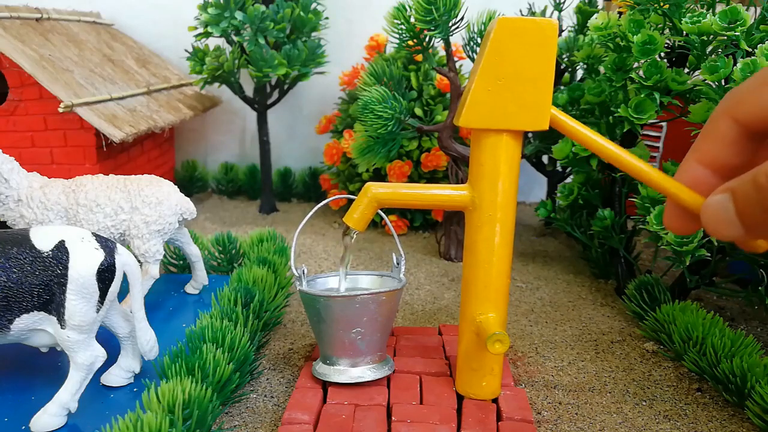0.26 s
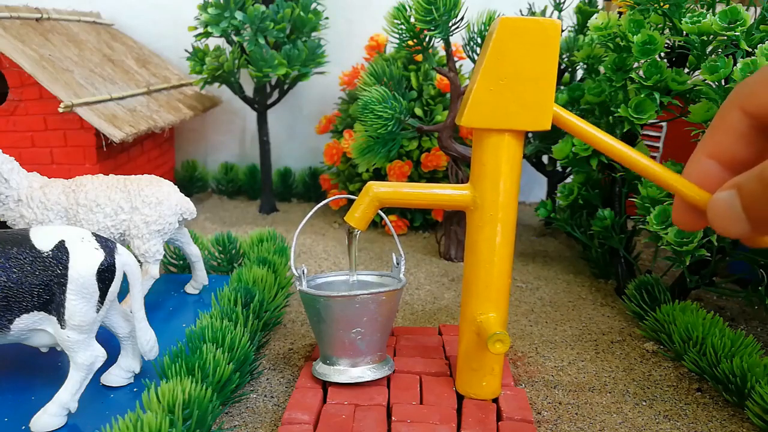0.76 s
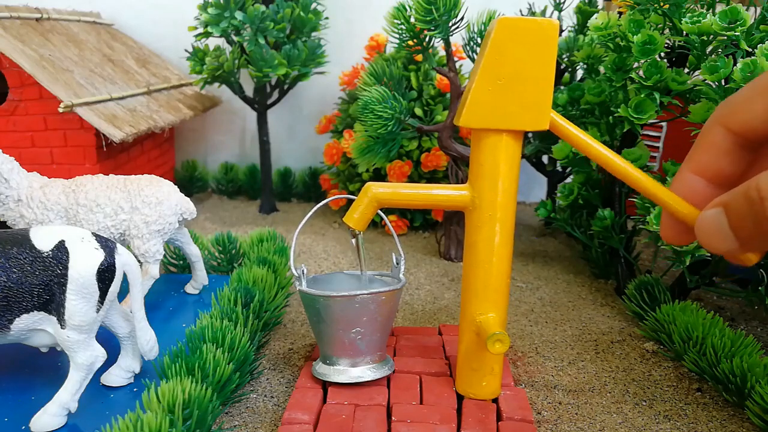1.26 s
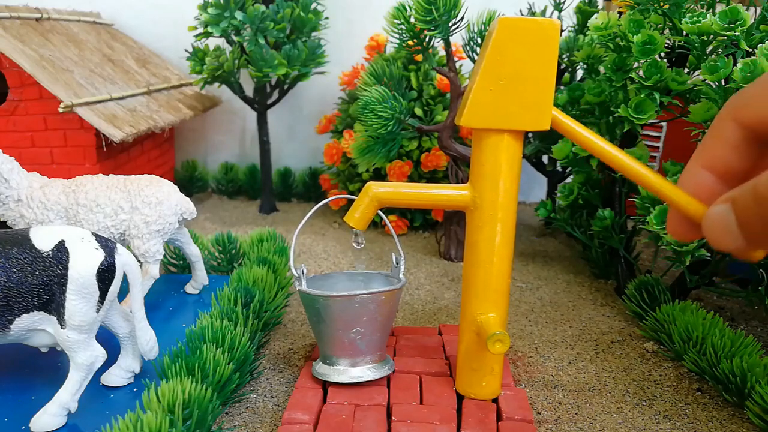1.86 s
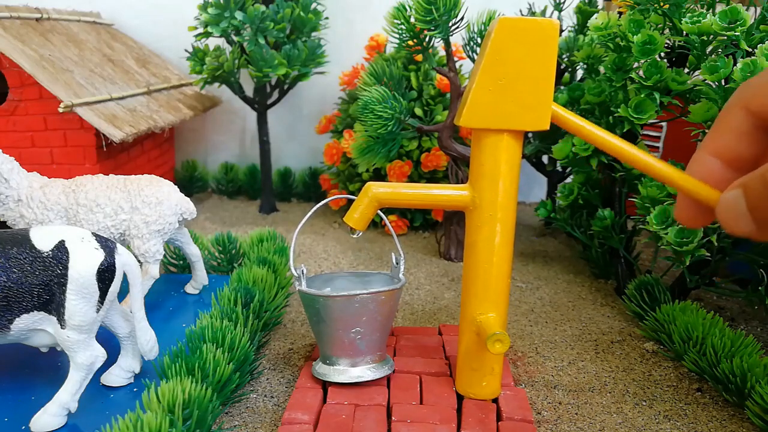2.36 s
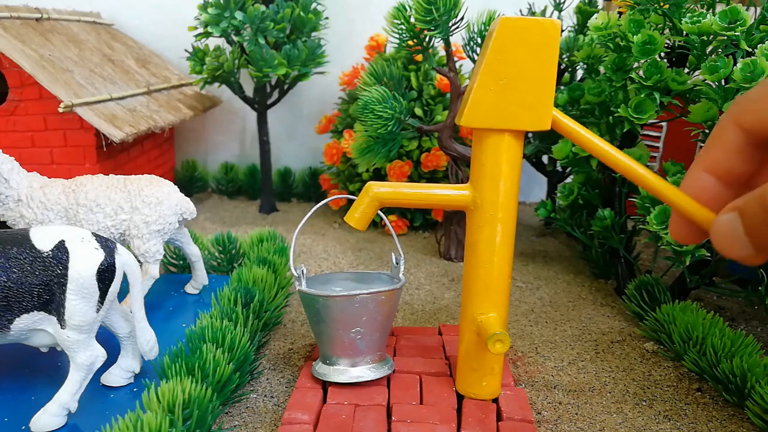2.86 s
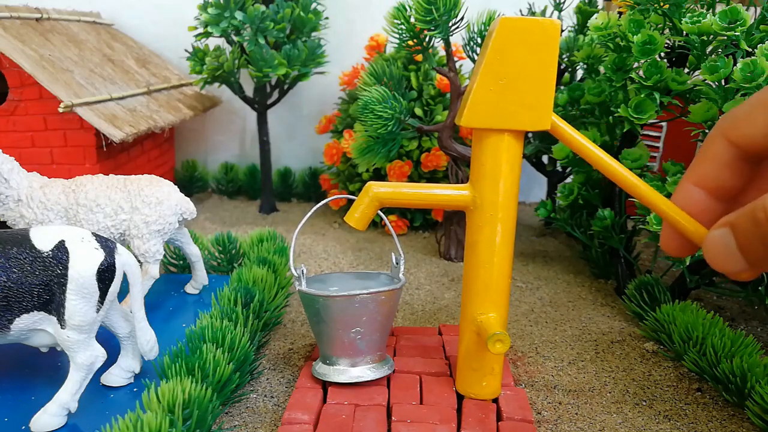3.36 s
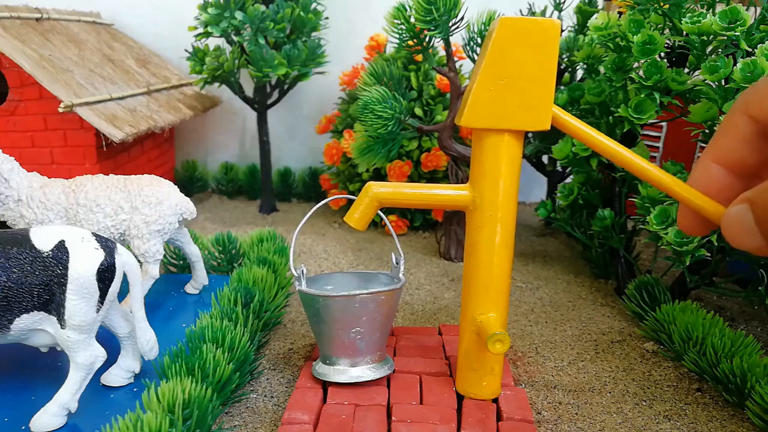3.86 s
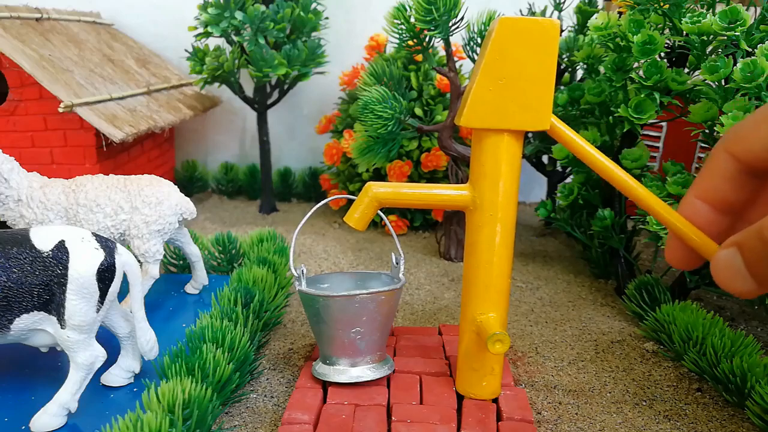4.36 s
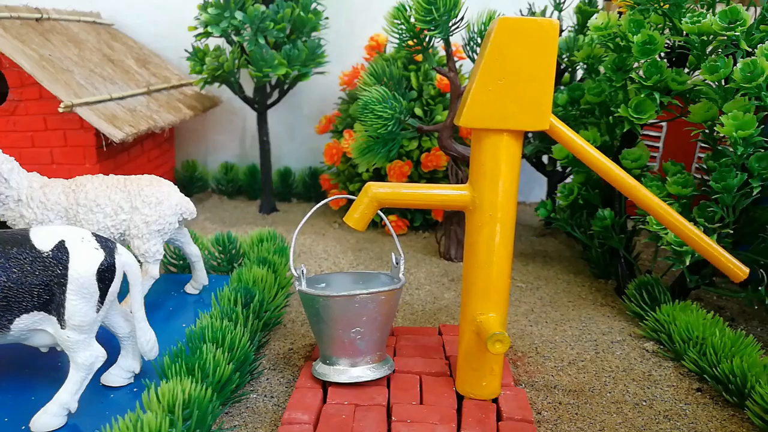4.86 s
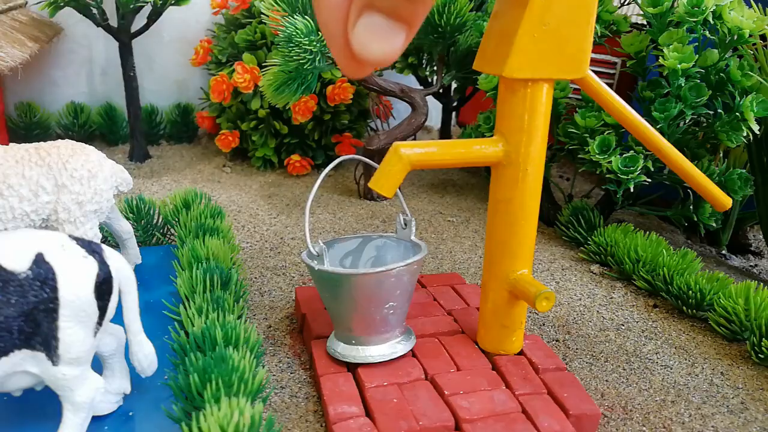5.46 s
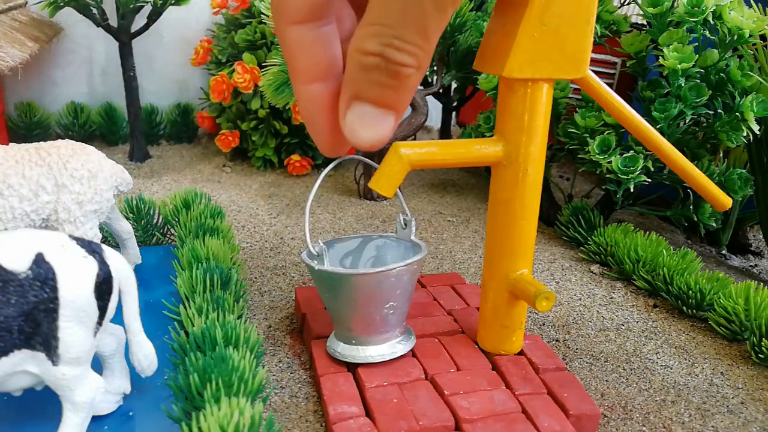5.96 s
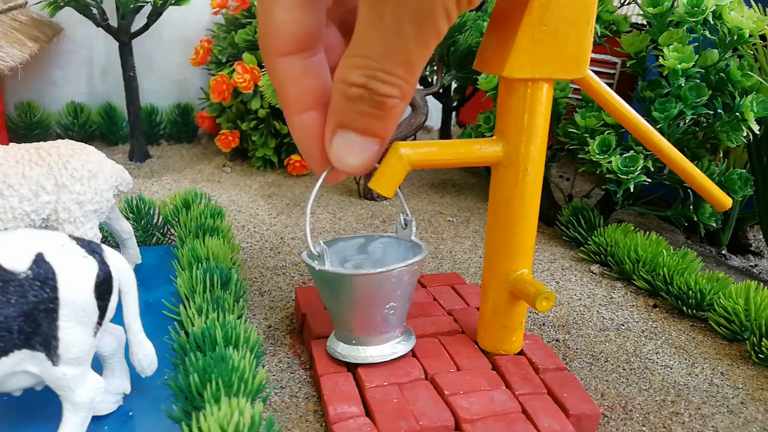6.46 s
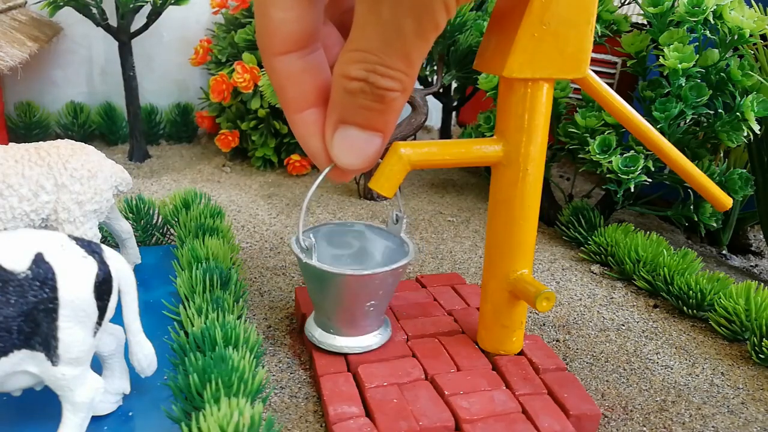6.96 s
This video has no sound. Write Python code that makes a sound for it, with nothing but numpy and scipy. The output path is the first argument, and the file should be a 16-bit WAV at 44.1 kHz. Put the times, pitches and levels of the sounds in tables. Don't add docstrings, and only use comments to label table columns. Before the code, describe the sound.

A hand pump's stream gushes and trickles into a metal pail, centred and near, slapping the rim and fizzing with droplets. It ends suddenly after about two and a half seconds. Stereo outdoor woodland remains: steady high insect hiss, crickets chirping mainly at left, and clear birds slightly right, sweeping up or down into reverberant echoes. A momentary dropout comes first, then a hard cut straight into a whistle.

```python
import sys
import numpy as np
from scipy import signal
from scipy.fft import rfft, irfft, next_fast_len
from scipy.io import wavfile
from scipy.ndimage import uniform_filter1d

SR = 44100
rng = np.random.default_rng(int(sys.argv[2]) if len(sys.argv) > 2 else 0)


def volts_from_db(level):
    exponent = np.asarray(level, float) / 20
    return 10 ** exponent


def to_wav(sig):
    pcm = np.clip(np.atleast_2d(sig), -1, 1) * 32767
    pcm = np.round(pcm).astype(np.int16)
    wavfile.write(sys.argv[1], SR, pcm.T)


N = 317961
TIME = np.arange(N) / SR
SIZE = next_fast_len(N)
SILENCE_START_S, SILENCE_END_S, JUMP_S = 3.3145, 3.3595, 5.112
STREAM_END_S = 2.385
LOOSE_S = 1.84


def unit(x):
    return x / np.sqrt(np.mean(x ** 2) + 1e-20)


def spread(mid, side):
    return np.array([mid + side, mid - side])


def band(x, low_hz, high_hz, order=2):
    return signal.sosfilt(signal.butter(order, [low_hz, high_hz], "band", fs=SR, output="sos"), x)


def highpass(x, hz):
    return signal.sosfilt(signal.butter(2, hz, "high", fs=SR, output="sos"), x)


def drift(rate_hz):
    r = np.exp(-80 * np.pi * rate_hz / SR)
    slow = signal.lfilter([1], [1, -2 * r, r * r], rng.standard_normal(N // 40 + 2002))[2000:]
    return np.interp(np.arange(N) / 40, np.arange(len(slow)), unit(slow))


def resonate(x, hz, width_hz):
    r = np.exp(-np.pi * width_hz / SR)
    zeros = np.array([1, 0, -1]) * (1 - r * r) / 2
    return signal.lfilter(zeros, [1, -2 * r * np.cos(2 * np.pi * hz / SR), r * r], x)


def grains(per_s, spread_db):
    sizes = volts_from_db(spread_db * np.minimum(rng.exponential(1, N), 5)) * rng.choice([-1, 1], N)
    return unit(sizes * (rng.random(N) < per_s / SR)) + 1e-18


def colour(x, spectrum, patchy_db):
    hz = np.maximum(np.arange(SIZE // 2 + 1) * SR / SIZE, 5)
    points = np.array(spectrum)
    shaped = rfft(x, SIZE) * volts_from_db(np.interp(np.log(hz), np.log(points[:, 0]), points[:, 1]))
    place = 2 * np.log2(hz / 2000)
    together = drift(13)
    out = irfft(shaped * np.clip(-place, 0, 1), SIZE)[..., :N]
    for k in range(8):
        part = irfft(shaped * np.clip(1 - abs(place - k), 0, 1), SIZE)[..., :N]
        out = out + part * volts_from_db(patchy_db * (1.3 * together + drift(25)))
    return unit(out)


def add(track, s, sound):
    i = round(s * SR)
    track[i:i + len(sound)] += sound[:N - i]


def glide(rows, edge_s, rough_hz=0):
    s, hz, level_db = np.transpose(rows)
    t = np.arange(s[0], s[-1], 1 / SR)
    fade = np.clip(np.minimum(t - s[0], s[-1] - t) / edge_s, 0, 1)
    wobble_hz = rough_hz * unit(uniform_filter1d(rng.standard_normal(len(t)), size=120))
    phase = 2 * np.pi * np.cumsum(np.interp(t, s, hz) + wobble_hz) / SR
    return np.sqrt(2) * fade * volts_from_db(np.interp(t, s, level_db)) * np.sin(phase)


def insects():
    # pitch_hz, level_db (per Hz)
    chorus_spectrum = [(2600, -49), (3200, -26.5), (3700, -25.5), (4050, -19), (4430, -11), (4800, -1),
                       (6050, -3), (7650, -2), (8710, -11), (10600, -21.5), (13000, -24), (16000, -23)]
    # pitch_hz, width_hz, level_db
    drones = [(4133, 110, -18), (7500, 290, -17)]
    # pitch_hz, level_db (per Hz)
    air_spectrum = [(20, -21), (60, -5), (150, -15), (700, -16), (1100, -15), (2500, -19.5), (3200, -16),
                    (4000, -50.5)]
    chorus = colour(np.array([grains(9000, 0.824), grains(9000, 3.7)]), chorus_spectrum, patchy_db=0.76)
    for hz, width_hz, level_db in drones:
        voice = unit(resonate(rng.standard_normal((2, N)), hz, width_hz))
        chorus = chorus + volts_from_db(level_db + 3.8 * drift(15)) * voice
    side = band(chorus[0] - chorus[1], 6440, 10400) / 2
    chorus = chorus - 0.4 * spread(0, side)
    air = colour(rng.standard_normal((2, N)), air_spectrum, patchy_db=1.2)
    shrill = unit(band(rng.standard_normal((2, N)), 10500, 14950, order=4))
    before = TIME < SILENCE_START_S
    chorus_db = np.where(before, -38, -33.5)
    balance_db = np.array([[1.6], [-1.6]])
    return volts_from_db(-61) * before * shrill + volts_from_db(chorus_db) * chorus * volts_from_db(balance_db) + volts_from_db(-59.5) * air


def crickets():
    # first_s, last_s, chirps, peak_db
    runs = [(.0189, .2294, 2, -28), (.5616, .5616, 1, -27.5), (0.777, 1.8861, 7, -28.5),
            (2.1041, 2.6915, 4, -28.5), (2.873, 3.2422, 3, -28.5), (3.4193, 3.592, 2, -25),
            (3.799, 4.0046, 2, -28.5), (3.88, 4.255, 2, -27.5), (4.4014, 4.4014, 1, -31),
            (4.467, 4.8466, 3, -30), (4.58, 4.9686, 3, -25), (5.1417, 5.1804, 2, -29),
            (5.3093, 5.5034, 2, -27), (5.663, 5.866, 2, -21.5), (6.0576, 5.8, 2, -28),
            (6.207, 6.7455, 4, -26), (6.4083, 6.9647, 4, -27), (6.9078, 7.0856, 2, -27),
            (7.1277, 7.1272, 1, -26.5)]
    faint_per_s, faint_db = 6.1, -34.5
    out = np.zeros(N)
    chirp = glide([(0, 5160, 1.5), (.004, 4713, -4), (.012, 4620, -12.5)], edge_s=0.0018)
    for first_s, last_s, chirps, peak_db in runs:
        for s in np.linspace(first_s, last_s, round(chirps)):
            add(out, s, volts_from_db(peak_db) * chirp)
    for s, spread_db in rng.uniform([0, -4], [N / SR, 2], (round(faint_per_s * N / SR), 2)):
        add(out, s, volts_from_db(faint_db + spread_db) * chirp)
    return np.array([volts_from_db(2.5) * out, volts_from_db(-6.5) * np.roll(out, shift=12)])


def forest(x, t60_s):
    trunks_t60_s, onset_s = 0.25, .012
    t = np.arange(2 * SR) / SR
    decay = volts_from_db(-60 * t / trunks_t60_s) + volts_from_db(-8.5 - 60 * t / t60_s)
    mid, side = rng.standard_normal((2, len(t))) * decay * np.minimum(t / onset_s, 1)
    tail = spread(mid, volts_from_db(-2.5) * side) / np.sqrt(np.sum(mid ** 2))
    return signal.fftconvolve(x[None], highpass(tail, 1500))[:, :N]


def hollowed(x):
    # pitch_hz, width_hz, share_lost
    hollows = [(1235, 40, .55), (1350, 60, .8), (1785, 80, .8), (2280, 140, .9), (2710, 120, .75)]
    for hz, width_hz, share in hollows:
        x = x - share * resonate(x, hz, width_hz)
    return x


def rise(middle_s, lead_in_s, pace, level_db, lead_in_db):
    # after_middle_s, pitch_hz, level_db
    climb = [(-.135, 1125, -13), (-.11, 1200, -9), (-.088, 1305, -7), (-.058, 1505, -4), (0, 1910, 0),
             (.025, 2150, 0), (.052, 2550, -1), (.072, 2900, -5), (.078, 2970, -16)]
    rows = [(middle_s + s * (pace if s < 0 else 1), hz, level_db + db) for s, hz, db in climb]
    return [(rows[0][0] - max(lead_in_s, .005), 1112, lead_in_db)] + rows


def earlier_bird():
    track = np.zeros(N)
    rows = rise(4.82, lead_in_s=.1, pace=1.0, level_db=-25, lead_in_db=-50)
    add(track, rows[0][0], glide(rows, edge_s=.008))
    return track


def birds():
    # middle_s, lead_in_s, low_half_pace, level_db, lead_in_db
    rises = [
        (5.26, .004, 1.0, -23.5, -33),
        (5.583, 0.112, .9, -23.5, -55),
        (6.356, 0.12, 1.0, -23.5, -53),
    ]
    # time_s, pitch_hz, level_db
    slow_rise = [(2.275, 1145, -45.5), (2.3, 1200, -33.5), (2.335, 1330, -35), (2.378, 1657, -27),
                 (2.432, 1979, -23), (2.492, 2260, -23), (2.54, 2452, -26), (2.6, 2836, -26)]
    fall = [(3.878, 4100, -55), (3.894, 3560, -44), (3.902, 3350, -28), (3.916, 2950, -23),
            (3.936, 2500, -24.5), (3.962, 2083, -26.5), (3.986, 1590, -28.5), (4.004, 1316, -30),
            (4.02, 1146, -36)]
    held = [(4.04, 1088, -42), (4.09, 1095, -46), (4.12, 1115, -40), (4.135, 1125, -51), (4.16, 1105, -46),
            (4.19, 1105, -57), (4.215, 1100, -49), (4.25, 1110, -60), (4.33, 1120, -66)]
    knock = [(5.95, 1050, -58), (5.97, 950, -53), (5.99, 880, -60)]
    arch = [(5.17, 2800, -65), (5.23, 3400, -60), (5.28, 3650, -61), (5.335, 3720, -65)]
    hoot = [(3.04, 2150, -64), (3.1, 2220, -58), (3.17, 2180, -64)]
    chirp = [(2.028, 4450, -37), (2.06, 4180, -31.5), (2.095, 3620, -27.5), (2.115, 3700, -40.5)]
    chirp_end = [(2.092, 3694, -19.5), (2.103, 3430, -23), (2.113, 3010, -24.5), (2.126, 2900, -32.5)]
    # time_s, pitch_hz, level_db
    murmurs = [
        [(4.33, 1120, -58), (4.43, 1135, -60), (4.46, 1145, -47), (4.5, 1140, -60.5), (4.57, 1190, -60),
         (4.59, 1255, -54), (4.68, 1400, -60.5), (4.77, 1300, -60.5), (4.825, 1100, -56)],
        [(6.46, 1150, -60), (6.55, 1100, -60), (6.69, 1200, -58), (6.72, 1290, -55.5), (6.79, 1360, -59),
         (6.85, 1330, -57.5), (6.89, 1200, -60), (7.13, 1155, -61), (7.21, 1350, -54)],
    ]
    # start_s, stretch_s, level_db
    far_calls = [
        (6.538, .012, -43),
        (6.622, .01, -41),
        (6.728, .015, -42),
        (6.93, .035, -44),
        (7.1, .035, -41.5),
    ]
    # after_s, pitch_hz, level_db
    far_drop = [(0, 2854, 1.5), (.018, 2677, 2), (.036, 2400, -1.5)]
    # start_s, length_s
    buzzes = [
        (5.612, .032),
        (6.32, .03),
        (3.888, .04),
    ]
    # low_hz, high_hz, level_db
    buzz_bands = [(3600, 4700, -31), (3300, 3800, -52), (3500, 4150, -42)]

    near, far, deep, rasps = np.zeros((4, N))
    for rows in [slow_rise, [*fall, *held]] + [rise(*row) for row in rises]:
        add(near, rows[0][0], glide(rows, edge_s=0.0037, rough_hz=13))
    for rows in [knock, arch, hoot, *murmurs]:
        add(far, rows[0][0], glide(rows, edge_s=.012, rough_hz=30))
    for rows in [chirp, chirp_end]:
        add(deep, rows[0][0], glide(rows, edge_s=.01, rough_hz=130))
    for s, stretch_s, level_db in far_calls:
        rows = [(0, 2880, -4.5)] + [(stretch_s + after_s, hz, db) for after_s, hz, db in far_drop]
        add(far, s, volts_from_db(level_db) * glide(rows, edge_s=0.01, rough_hz=25))
    for (s, length_s), (low_hz, high_hz, level_db) in zip(buzzes, buzz_bands):
        t = np.arange(0, length_s, 1 / SR)
        pulses = np.sin(np.pi * 230 * t) ** 8 * (0.35 + rng.standard_normal(len(t)))
        carrier = np.sin(2 * np.pi * 4250 * t + 2 * np.sin(2 * np.pi * 460 * t))
        rasp = unit(band(pulses * carrier, low_hz, high_hz, order=4))
        add(rasps, s, volts_from_db(level_db) * np.sin(np.pi * t / length_s) * rasp)
    return near, far * abs(1 + .35 * drift(40)), deep, rasps


def woods():
    near, far, deep, rasps = birds()
    earlier = earlier_bird()
    direct = hollowed(near) * abs(1 + .17 * drift(68.26) + .07 * drift(300))
    out = insects() + crickets() + [volts_from_db(5.0) * np.roll(direct, shift=-3), volts_from_db(7.5) * direct]
    out = out + far + volts_from_db(1.0) * deep + rasps
    echoed = volts_from_db(-1.0) * near + volts_from_db(-1.5) * far + deep + volts_from_db(-15.5) * rasps
    parts = [(0, SILENCE_START_S, 1.01), (SILENCE_END_S, JUMP_S, 1.13), (JUMP_S, N / SR, 0.94)]
    for start_s, end_s, t60_s in parts:
        part = (TIME >= start_s) & (TIME < end_s)
        out = out + part * forest((start_s == JUMP_S) * earlier + part * echoed, t60_s)
    return out


def swells(base_db, rows):
    attack_s, release_s = 0.019, 0.033
    power = volts_from_db(2 * base_db)
    for s, hold_s, level_db in rows:
        late = np.maximum((s - TIME) / attack_s, (TIME - s - hold_s) / release_s)
        power = power + volts_from_db(2 * (level_db - 10 * np.clip(late, 0, 9)))
    return 10 * np.log10(power)


def stream():
    # start_s, hold_s, boom_db, wall_db
    gushes = [(0.01, 0.052, -31.5, -33), (0.147, .01, -31, -35.5), (0.49, 0.035, -33, -50),
              (0.768, 0.11, -31, -34), (0.919, 0.24, -36, -34.5), (1.574, 0.04, -24.5, -55),
              (1.676, 0.039, -24.5, -33), (1.739, 0.026, -19, -41), (1.911, .03, -27.5, -42.5),
              (1.962, .03, -23.5, -27), (2.012, 0.052, -33, -40), (2.213, 0.039, -24.5, -42)]
    # start_s, hold_s, level_db
    grazes = [(0.252, 0.037, -36.5), (0.404, 0.077, -33.5), (0.587, 0.063, -37), (0.893, 0.054, -31),
              (1.037, 0.038, -33), (1.147, 0.073, -31), (1.293, 0.15, -35), (1.53, 0.022, -35.5),
              (1.638, 0.022, -31.5), (1.722, 0.03, -34), (1.857, 0.015, -38), (1.96, 0.011, -28),
              (2.205, 0.015, -34.5), (2.304, .02, -44)]
    trickle_boom_db, trickle_wall_db, trickle_note_db = -40, -39.5, -43.5
    damped_db = np.clip((TIME - 2.03) / .05, 0, 1)
    boom_db = swells(trickle_boom_db - damped_db, [(s, hold_s, db) for s, hold_s, db, _ in gushes])
    wall_db = swells(trickle_wall_db - damped_db, [(s, hold_s, db) for s, hold_s, _, db in gushes])
    note_db = swells(trickle_note_db - 2 * damped_db, grazes)
    over_db = wall_db + damped_db - trickle_wall_db
    splash_db = -40 + 0.32 * over_db
    thud_db = -58 + .4 * over_db + 7 * (TIME > LOOSE_S)
    return boom_db, wall_db, note_db, splash_db, thud_db


def splash(splash_db, thud_db):
    # pitch_hz, level_db (per Hz)
    wash_spectrum = [(24, -59.5), (40, -30.5), (209, -10), (320, -23.5), (516, -13.5), (663, -11),
                     (810, -14.5), (1410, -13.5), (7930, -20), (16000, -36.5)]
    mid, side = colour(np.array([grains(4000, 2.6), grains(4000, 2.6)]), wash_spectrum, patchy_db=1.6)
    wash = spread(mid, volts_from_db(-3.0) * highpass(side, 380))
    droplets = grains(500, 2.2)
    dealt = rng.integers(0, 16, N)
    sides_db = rng.normal(0, 9, 16)[:, None, None] * [[1], [-1]]
    fizz = 0
    for k, hz in enumerate(np.geomspace(900, 5000, 16)):
        fizz = fizz + volts_from_db(sides_db[k]) * resonate(droplets * (dealt == k), hz, hz / 14)
    spray = band([grains(3004, 3.2), grains(2660, 3.5)], 7500, 14000)
    bright = volts_from_db(-52 + 1.3 * drift(21)) * unit(spread(spray[0], 0.689 * spray[1]))
    thud = band(rng.standard_normal(N), 18, 80)
    wet = volts_from_db(4.5) * wash + volts_from_db(-1.0 + 3.5 * drift(10)) * unit(fizz)
    wet = wet - .5 * resonate(wet, 4520, 900)
    return volts_from_db(splash_db) * wet + bright + volts_from_db(thud_db) * unit(thud)


def drops():
    # start_s, peak_db, centre_hz, t60_s
    rim_slaps = [(0.0426, -12, 5850, 0.017), (0.1595, -35, 5700, .09), (0.3077, -26.5, 7900, 0.052),
                 (0.3691, -31, 7880, .09), (0.642, -28, 5430, .12), (0.6994, -23, 6960, 0.05),
                 (0.814, -15.5, 7700, 0.17), (0.925, -13, 7630, 0.16), (.99, -26, 12500, 0.088),
                 (1.061, -18, 6500, 0.039), (1.625, -33, 11100, 0.035), (.31, -36, 12100, 0.036),
                 (1.0974, -31, 8000, 0.8), (1.2, -17, 7900, 0.065), (1.9626, -15, 7160, 0.1),
                 (2.1967, -10.5, 7500, 0.072), (2.331, -24, 8750, 0.031), (0.929, -25, 4250, 0.063),
                 (1.959, -23, 2880, 0.13), (2.2, -19, 2800, 0.046), (.02, -27, 4400, .03),
                 (0.16, -25, 3300, .03), (.594, -22, 3200, 0.047), (.755, -27, 4800, .03),
                 (1.096, -22, 3200, .04)]
    # start_s, peak_db, centre_hz, t60_s
    swishes = [
        (0.779, -14.5, 7660, 0.21),
        (0.9, -23, 2600, 0.48),
        (1.1, -31, 2100, 0.3),
        (.79, -26, 1500, .3),
        (.96, -27, 1400, .3),
        (1.16, -28, 1300, .3),
        (1.228, -29, 7850, 0.78),
        (1.991, -16.5, 7500, 0.3),
    ]
    # start_s, peak_db
    ticks = [(0.0218, -24), (0.0398, -19), (0.1446, -37.5), (0.3082, -22), (0.3381, -30), (0.4075, -31),
             (0.7412, -36), (0.9243, -26), (0.9911, -28), (1.062, -36), (1.3977, -31), (1.6212, -29),
             (1.9335, -29), (1.9604, -24), (2.0193, -23), (2.0722, -29), (2.3306, -28)]
    # start_s, peak_db, pitch_hz
    single_bubbles = [(0.1121, -29.5, 1460), (0.1595, -22.5, 3100), (0.158, -25, 470), (0.02, -25, 957),
                      (0.2493, -31, 1900), (0.3701, -19.5, 4100), (0.4075, -27.5, 2630),
                      (0.4648, -27, 1940), (0.5297, -24.5, 3350), (0.594, -26, 1540), (0.6434, -20.5, 3500),
                      (0.6818, -28.5, 1700), (0.7168, -27, 2500), (0.7761, -38, 1490), (0.8579, -31, 1530),
                      (1.0625, -45, 1440), (1.0969, -29, 2150), (1.1233, -23, 2100), (1.125, -22, 1037),
                      (1.3109, -26, 1880), (1.3753, -28, 2010), (1.4077, -30, 1550), (1.5933, -33, 2520),
                      (1.6911, -20.5, 2480), (1.8776, -23, 2520), (2.021, -20, 3230)]
    # time_s, pitch_hz, peak_db
    plop = [
        (1.9572, 870, -6.5),
        (1.961, 1023, -1.5),
        (1.968, 1140, -6),
        (1.974, 1375, -1),
        (1.979, 1550, -12),
        (1.985, 1460, -17),
    ]
    slap_rise_s, swish_rise_s, push_s = 0.0012, 0.036, 0.013

    slaps, bubbles, t = np.zeros(N), np.zeros((2, N)), np.arange(SR // 5) / SR
    puffs = [(*row, slap_rise_s) for row in rim_slaps]
    puffs += [(*row, swish_rise_s) for row in swishes]
    puffs += [(s, db, 12000, 0.016, slap_rise_s) for s, db in ticks]
    for s, peak_db, hz, t60_s, rise_s in puffs:
        puff = unit(resonate(resonate(rng.standard_normal(len(t)), hz, 2400), hz, 1800))
        add(slaps, s, volts_from_db(peak_db - 7 - 60 * t / max(t60_s, .02)) * np.minimum(t / rise_s, 1) * puff)
    for s, peak_db, hz in single_bubbles:
        side_db = rng.normal(0, 4.2)
        envelope = volts_from_db(peak_db - 60 * t * hz / 70) * np.minimum(t / 0.0014, 1)
        bubble = envelope * np.sin(2 * np.pi * hz * t * (.96 + 3.0 * t))
        crack = unit(resonate(rng.standard_normal(len(t)), 3200, 2500))
        bubble = bubble + volts_from_db(peak_db - 10.5 - 60 * t / .025) * crack
        add(bubbles[0], s, volts_from_db(side_db) * bubble)
        add(bubbles[1], s, volts_from_db(-side_db) * bubble)
    add(slaps, plop[0][0], glide(plop, edge_s=0.00045) / np.sqrt(2))
    add(slaps, plop[0][0], volts_from_db(-24) * np.sin(np.pi * np.minimum(t / push_s, 1)) ** 2)
    return slaps + bubbles


def bucket(boom_db, wall_db, note_db):
    # pitch_hz, width_hz, level_db
    boom_modes = [(170, 16.6, -13), (201, 17, -5.5), (225.2, 13, -2)]
    # pitch_hz, width_hz, level_db
    wall_modes = [(399.4, 33, -1.5), (507, 33, -0.5), (571, 33, -2.5), (767, 80, 0), (948, 44, -6.5),
                  (1097, 110, -4.5), (1161, 54, -2)]
    note_hz, note_width_hz = 816, 36
    boom, wall = 0, 0
    for hz, width_hz, db in boom_modes:
        mode = resonate(resonate(rng.standard_normal(N), hz, width_hz), hz, 3 * width_hz)
        deeper_db = 8 * (hz < 180) * (TIME > LOOSE_S)
        boom = boom + volts_from_db(db + 2.0 * drift(9) + deeper_db) * mode
    for hz, width_hz, db in wall_modes:
        wall = wall + volts_from_db(db + 2.0 * drift(24)) * unit(resonate(grains(900, 4.5), hz, width_hz))
    note = resonate(resonate(grains(900, 2.1), note_hz, note_width_hz), note_hz, 60)
    boom = boom / uniform_filter1d(boom ** 2, size=2600) ** 0.325
    note = note / uniform_filter1d(note ** 2, size=1500) ** 0.44
    return volts_from_db(boom_db) * unit(boom) + volts_from_db(wall_db + 1.0) * unit(wall) + volts_from_db(note_db) * unit(note)


def scene():
    boom_db, wall_db, note_db, splash_db, thud_db = stream()
    water = bucket(boom_db, wall_db, note_db) + splash(splash_db, thud_db) + drops()
    water = water * np.clip((STREAM_END_S - TIME) / 0.016, 0, 1)
    gap = np.clip(np.maximum(SILENCE_START_S - TIME, TIME - SILENCE_END_S) / 0.00121, 0, 1)
    return (water + woods()) * gap


def starve(x):
    # pitch_hz, mid_db, side_db
    margins = [(100, 28.5, 29), (1600, 27, 27), (3000, 21.5, 21.5), (3500, 16.5, 16.5), (4000, 19, 19),
               (8500, 20, 13), (11000, 21, 18.5), (14500, 20.5, 18), (15800, 18, 15)]
    hz, s, cells = signal.stft(spread(*x) / 2, SR, "cosine", 2048, 1024)
    starts = np.arange(0, len(hz), 10)
    level_db = 10 * np.log10(np.add.reduceat(abs(cells) ** 2, starts, axis=1) + 1e-20)
    hz_points, *margins_db = np.transpose(margins)
    margin_db = np.array([np.interp(hz[starts], hz_points, m) for m in margins_db])[:, :, None]
    wander_db = drift(4)[np.minimum(s * SR, N - 1).astype(int)]
    wander_db = wander_db + 3.0 * uniform_filter1d(rng.standard_normal(level_db.shape), size=2)
    loud_db = np.percentile(level_db.max(axis=0), 88, axis=0)
    keep = (level_db > loud_db - margin_db + wander_db)[:, np.arange(len(hz)) // 10]
    cells = cells * keep * (hz < 15900)[:, None]
    return spread(*signal.istft(cells, SR, "cosine", 2048, 1024)[1][:, :N])


def roll_off(x):
    return signal.sosfilt(signal.butter(12, 16420, fs=SR, output="sos"), x)


def record(dry):
    mix = starve(dry)
    return roll_off(mix)


dry = scene()
out = record(dry)
to_wav(out)
```